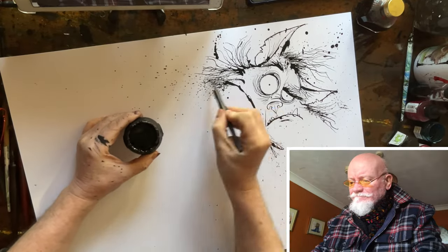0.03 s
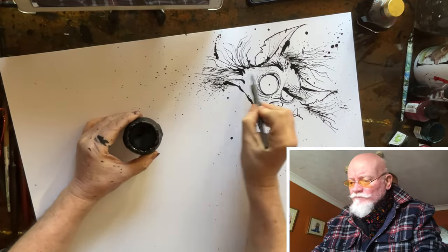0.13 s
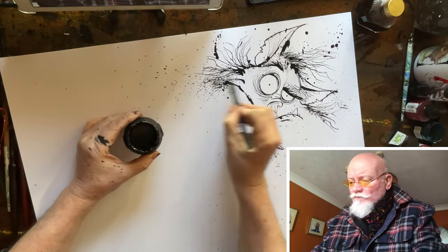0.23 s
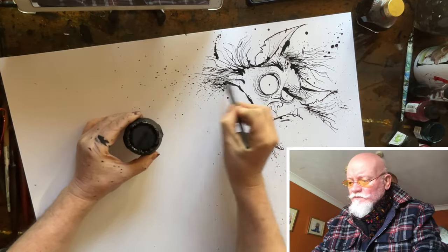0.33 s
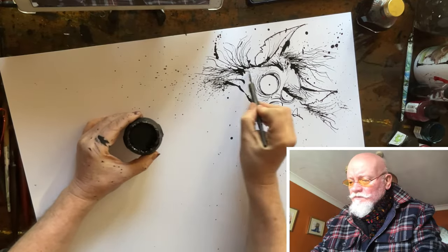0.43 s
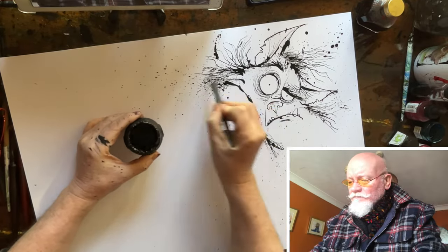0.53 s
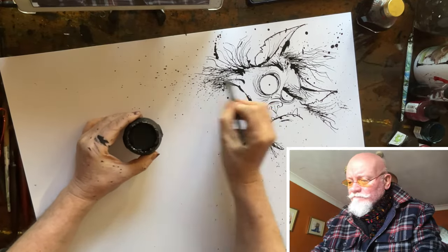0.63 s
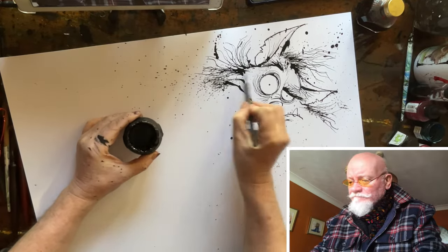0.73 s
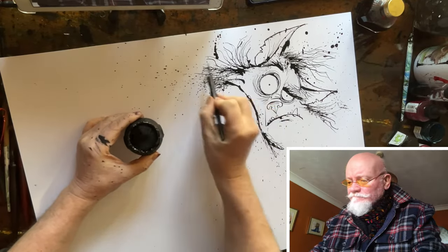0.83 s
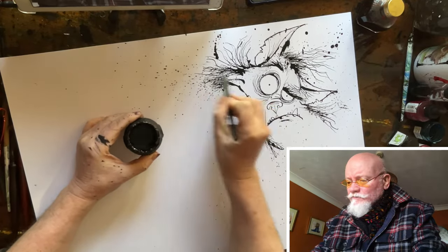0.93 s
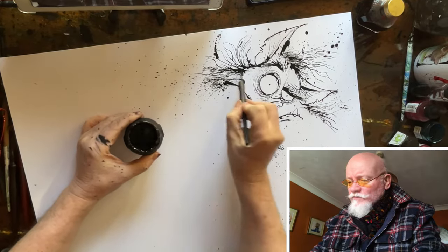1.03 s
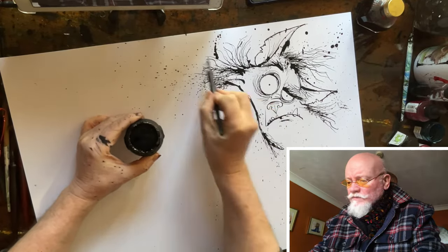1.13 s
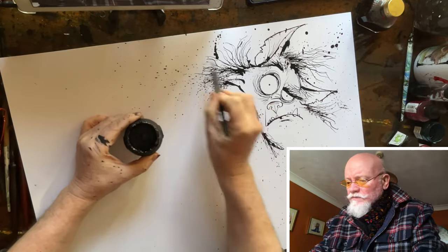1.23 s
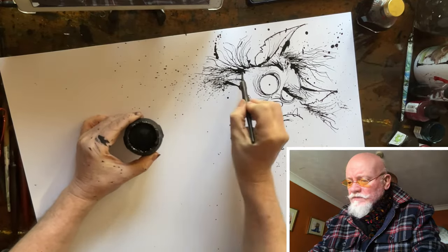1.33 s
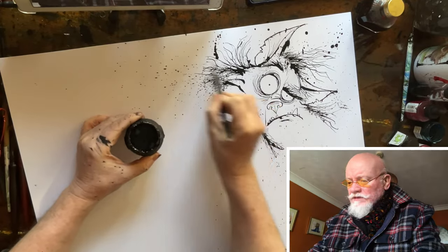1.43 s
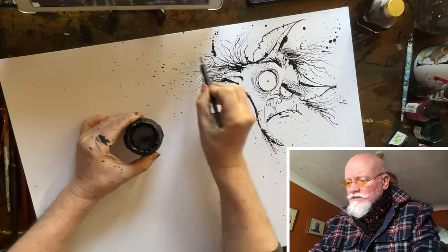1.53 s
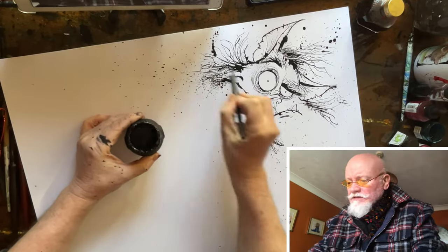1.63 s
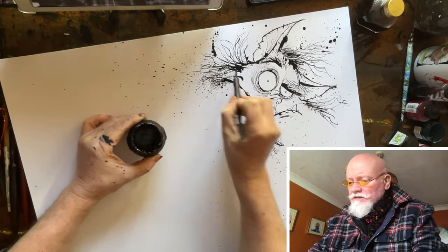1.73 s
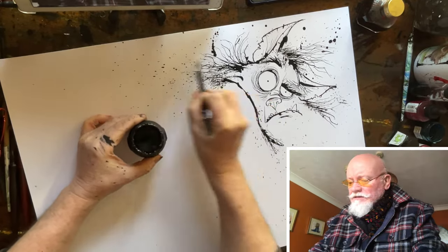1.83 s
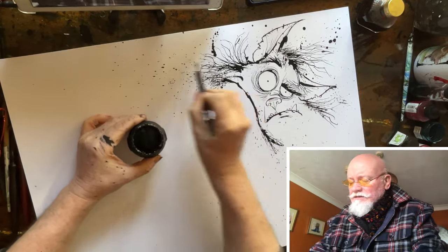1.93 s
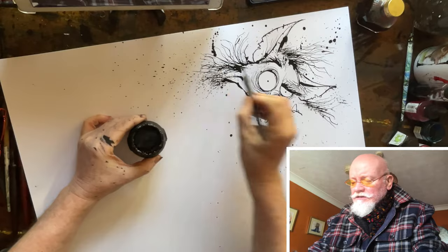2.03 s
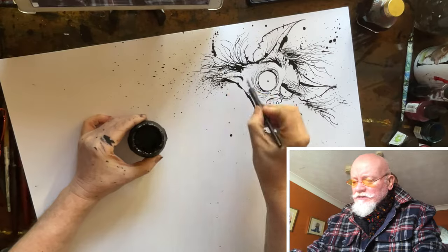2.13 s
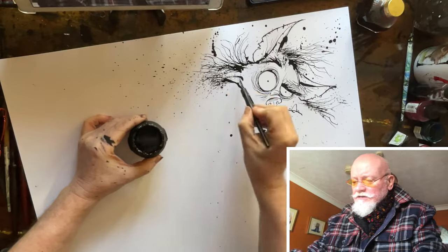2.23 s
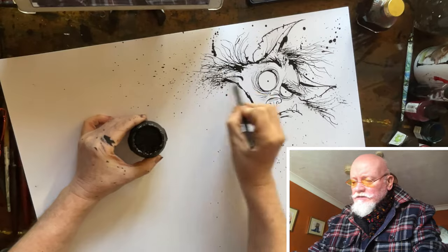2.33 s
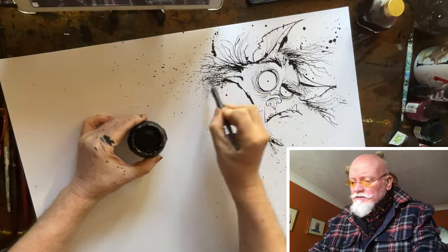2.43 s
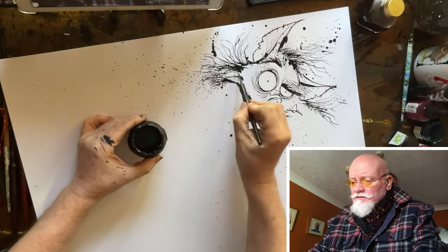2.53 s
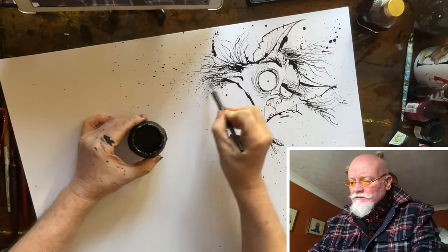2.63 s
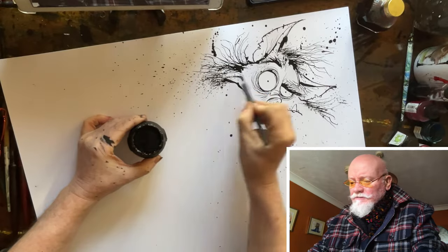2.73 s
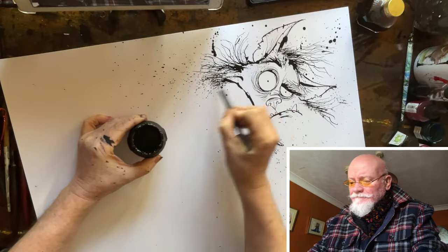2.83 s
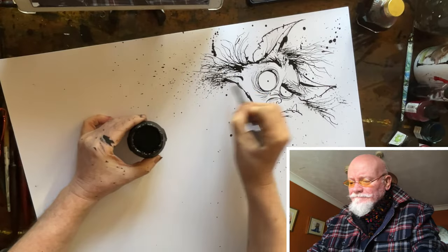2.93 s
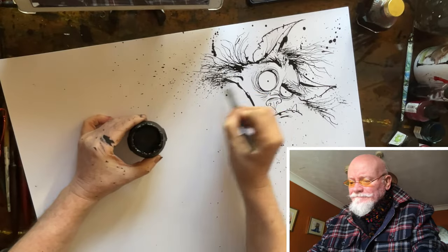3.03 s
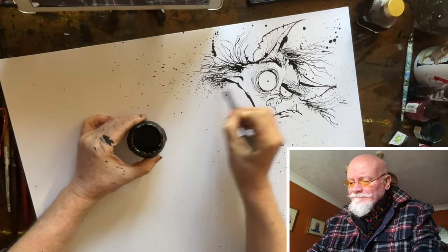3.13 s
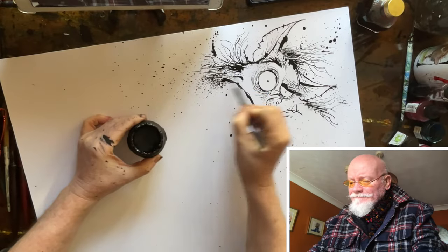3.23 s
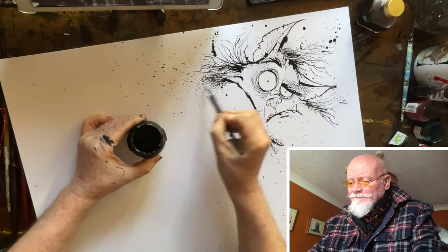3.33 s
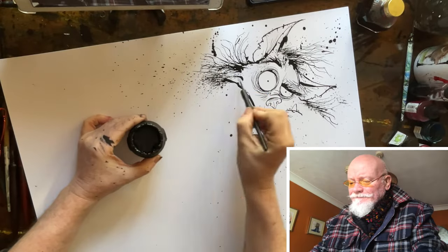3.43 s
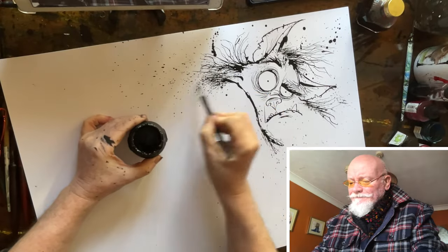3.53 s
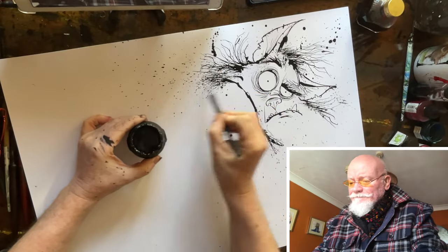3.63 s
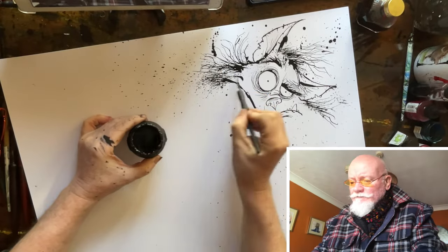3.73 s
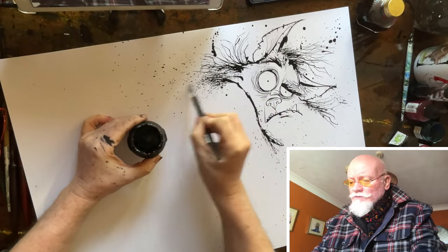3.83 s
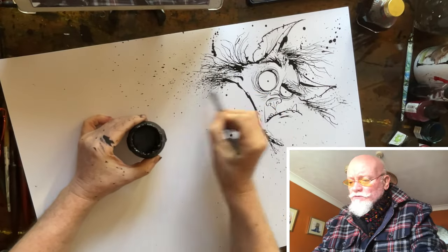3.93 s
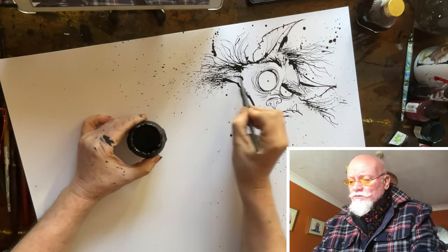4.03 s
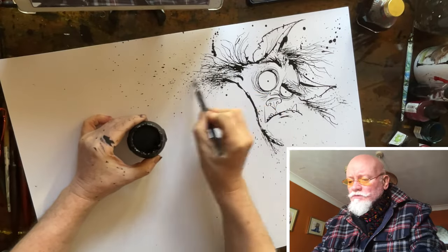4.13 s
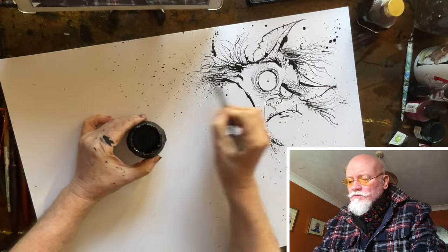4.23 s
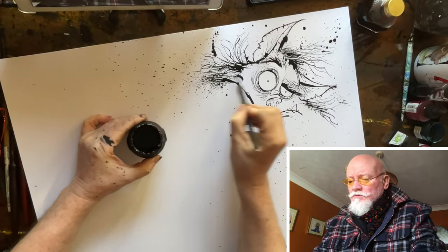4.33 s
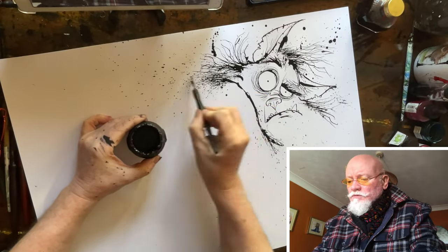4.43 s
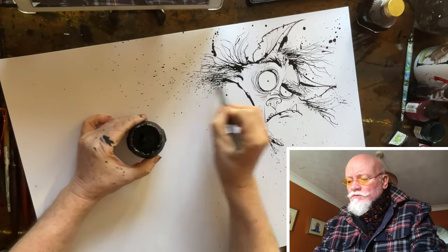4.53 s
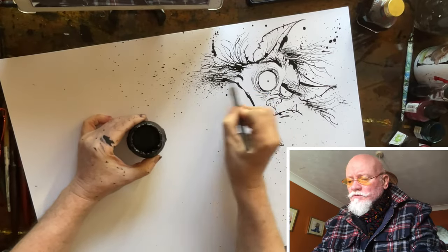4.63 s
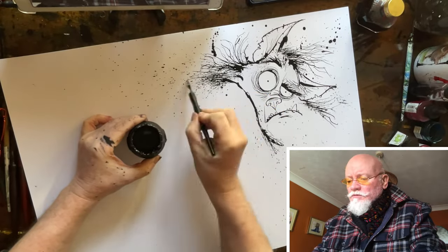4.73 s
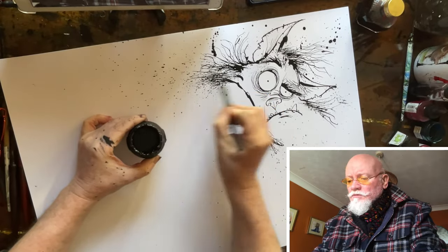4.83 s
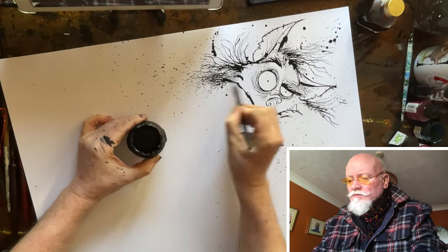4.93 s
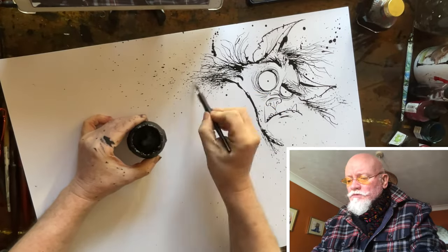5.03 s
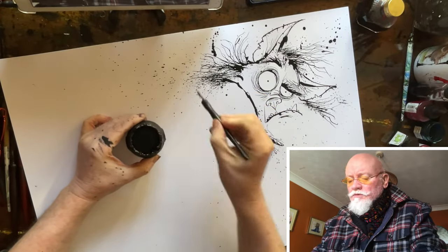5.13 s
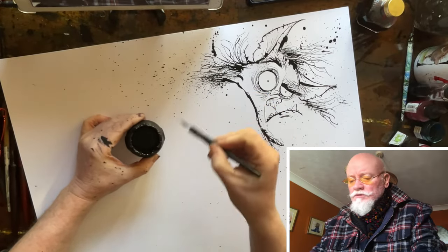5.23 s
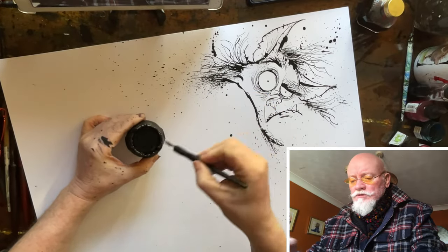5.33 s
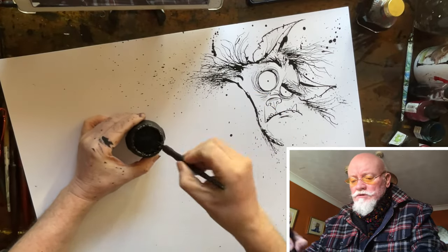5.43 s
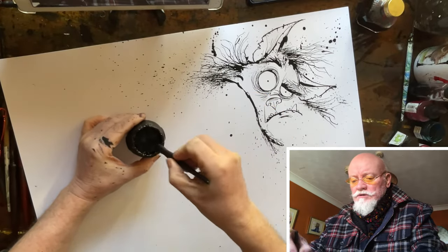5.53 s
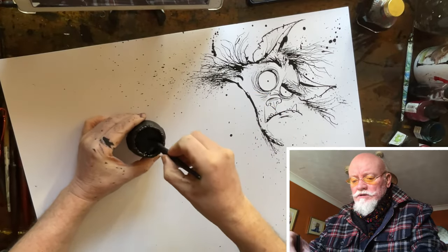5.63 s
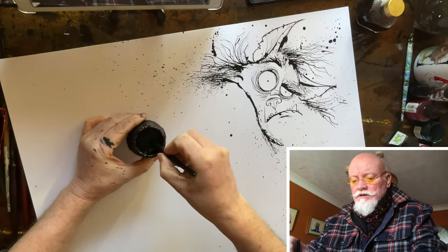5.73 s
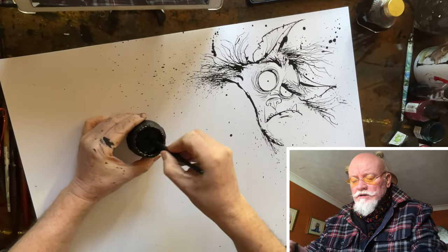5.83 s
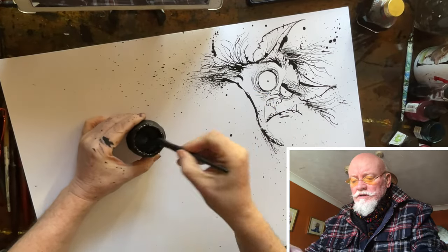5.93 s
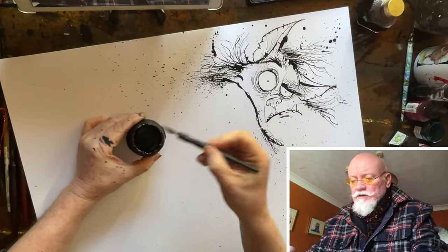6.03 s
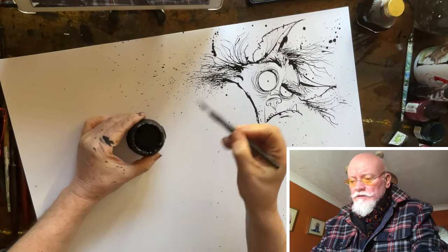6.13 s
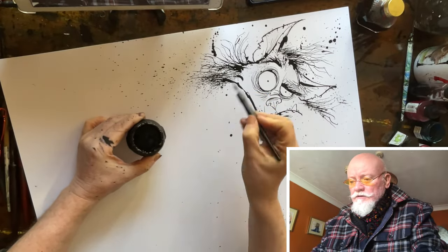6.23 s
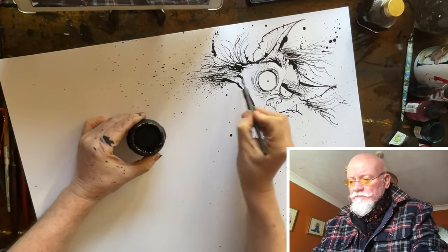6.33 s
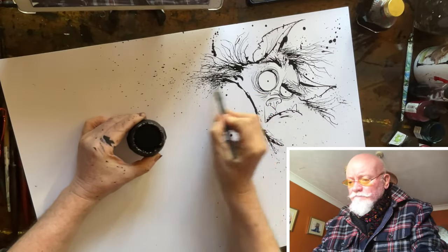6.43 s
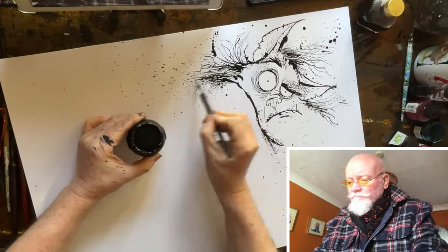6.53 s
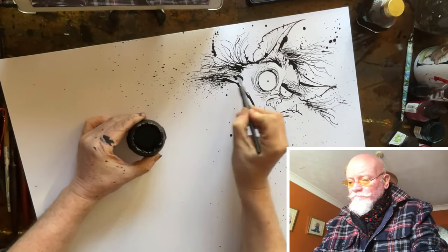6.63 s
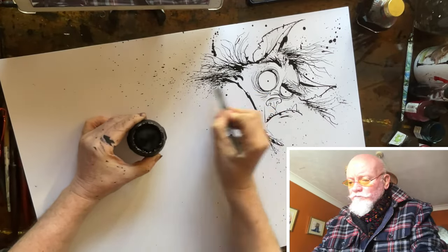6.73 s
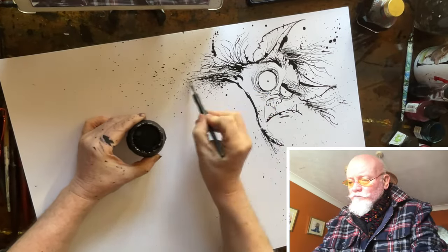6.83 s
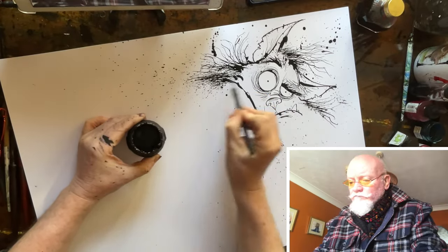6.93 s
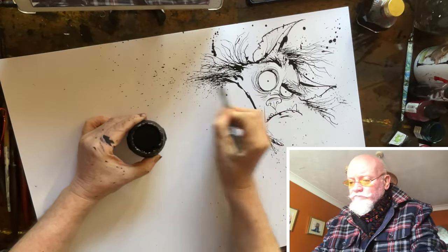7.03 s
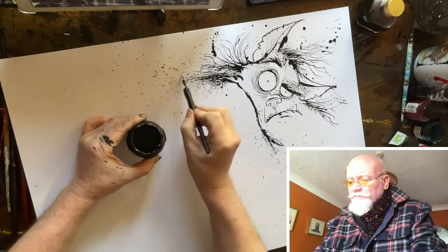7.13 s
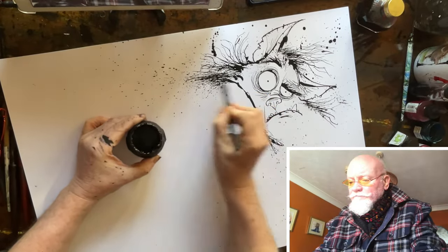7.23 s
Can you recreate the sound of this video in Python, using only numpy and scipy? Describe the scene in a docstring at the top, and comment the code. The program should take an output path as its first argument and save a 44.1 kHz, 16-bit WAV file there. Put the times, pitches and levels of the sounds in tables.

```python
"""A steel dip pen flicks quick hatching strokes over paper on a wooden desk in a small quiet room.
From the start there are still air, faint mains hum and the forearm's rumble. The nib ticks as it lands, then
snaps over the fibres, which sets nib, sheet and desk sounding; between flicks it sometimes drags lightly back.
Then the pen holder knocks, a sleeve rustles, the hand bumps softly on the desk and the nib squeals briefly.
Later, in a pause, the pen goes to the ink pot, with more bumps and rustles; then the last flicks follow."""
import sys
import numpy as np
from scipy import signal
from scipy.fft import rfft, irfft, next_fast_len
from scipy.io import wavfile
from scipy.ndimage import uniform_filter1d

SR = 44100
rng = np.random.default_rng(int(sys.argv[2]) if len(sys.argv) > 2 else 0)


def materialize(psi):
    """Save the field psi as 16-bit PCM at rate SR to the path in sys.argv[1].

    A 1-D psi becomes a single channel; in a 2-D psi each row is a channel.
    """
    bounded = np.clip(np.atleast_2d(psi).T, -1, 1)
    quanta = np.round(bounded * 32767).astype(np.int16)
    wavfile.write(sys.argv[1], SR, quanta)


N = 321048
SIZE = next_fast_len(N + SR // 2)   # samples in a Fourier transform, with space for the room's tail
HZ = np.maximum(np.arange(SIZE // 2 + 1) * SR / SIZE, 1)
TIME = np.arange(N) / SR
APART = np.array([[1], [-1]])   # opposite signs in left and right


def from_db(db):
    """Turn decibels into gain."""
    return 10 ** (np.asarray(db) / 20)


def over_hz(rows, axis=1, hz=HZ):
    """Read one column of a table along a log-frequency axis."""
    rows = np.array(rows)
    return np.interp(np.log(hz), np.log(rows[:, 0]), rows[:, axis])


def in_time(rows):
    """Join (time, value) points into a curve with a value at every sample."""
    return np.interp(TIME, *np.transpose(rows))


def drift(rate):
    """Wander at random around zero, with this many new values a second joined by straight lines."""
    knots = rng.standard_normal(int(N / SR * rate) + 2)
    return np.interp(TIME * rate, np.arange(len(knots)), knots)


def band(low_hz, high_hz, order=8):
    """Gain at each frequency of a band-pass; a higher order is steeper."""
    low_side = 1 + (low_hz / HZ) ** (2 * order)
    high_side = 1 + (HZ / high_hz) ** (2 * order)
    return (low_side * high_side) ** -.5


def colour(x, gain):
    """Filter without pre-echo (minimum phase), keeping the power of white noise."""
    evened = gain / np.sqrt(np.mean(gain ** 2))
    cepstrum = irfft(np.log(evened + 1e-5), SIZE)
    # folding the second half onto the first makes the filter act only after its input
    cepstrum[1:SIZE // 2] *= 2
    cepstrum[SIZE // 2 + 1:] = 0
    return irfft(rfft(x, SIZE) * np.exp(rfft(cepstrum)), SIZE)[..., :N]


def noise(spectrum):
    """Make noise of a given colour, with an rms level of about one."""
    gain = from_db(over_hz(spectrum)) * band(spectrum[0][0], spectrum[-1][0])
    return colour(rng.standard_normal(N), gain)


def bursts(rows, rise_s, decay_s):
    """Loudness curve of blows that rise and die away, cut after half a second."""
    out = np.zeros(N)
    for start, db in rows:
        at = max(int(start * SR), 0)
        t = TIME[:min(N - at, SR // 2)]
        out[at:at + len(t)] += from_db(db) * (1 - np.exp(-t / rise_s)) * np.exp(-t / decay_s)
    return out


# Colour of the room's still air. Each row: frequency in Hz, relative level in dB.
AIR_COLOUR = [(65, -30), (110, -10), (150, -22.5), (193, 0), (210, -26.5), (238, -19), (346, -19.5),
              (444, -23.5), (483, -16.5), (583, -30.5), (1340, -26), (2120, -40), (16000, -62.5)]


def still_air():
    """Steady quiet noise, mostly shared by both sides and partly different left and right."""
    return from_db(-63) * (noise(AIR_COLOUR) + 0.4 * noise(AIR_COLOUR) * APART)


# Faint mains hum. Each row: frequency in Hz, rms level in dB.
MAINS_HUM = [(59.8, -64), (119.6, -70)]


def hum():
    """Mains hum and its octave, as pure tones."""
    return sum(np.sqrt(2) * from_db(db) * np.sin(2 * np.pi * hz * TIME) for hz, db in MAINS_HUM)


# Colour of the desk's rumble under the arm. Each row: frequency in Hz, relative level in dB.
RUMBLE_COLOUR = [(15, -40.5), (25, -27), (40, -9.5), (54, 2), (70, 0.5), (97, -18), (123, -7), (150, -11),
                 (200, -27.5), (330, -120)]
# The forearm shifts its weight. Each row: start in seconds, level in dB before the rise and fade.
WEIGHT_SHIFTS = [(.16, -49), (2.9, -43.5), (3.2, -50.5), (3.96, -39), (5.06, -48), (5.3, -43.5),
                 (5.44, -48), (6.41, -44), (6.95, -51)]


def forearm():
    """The desk rumbles unevenly under the arm all the time, and more when the arm's weight shifts."""
    bed = from_db(-59.5 + 2.5 * drift(8))
    level = bed + bursts(WEIGHT_SHIFTS, rise_s=.04, decay_s=0.052)
    return (noise(RUMBLE_COLOUR) + .08 * noise(RUMBLE_COLOUR) * APART) * level


# Resonances of desk, sheet and nib. Each row: frequency in Hz, width in Hz, relative level in dB.
BODY_RESONANCES = [(182.3, 100, -10), (259.3, 96, -4.5), (384, 310, -10.5), (521, 110, -4.5),
                   (797, 525, -1.5), (1190, 920, -27), (1680, 290, -7), (2238, 786, -2), (2540, 490, -6.5),
                   (3660, 760, -14), (4580, 860, -8), (5910, 870, -9.5), (7590, 940, -2.5),
                   (7940, 100, -14), (8580, 2800, -4.5), (9610, 890, -4), (11420, 1500, -6.5),
                   (12850, 1800, -7.5), (14240, 960, -3.5), (15300, 1100, -7)]


def pen_response():
    """Add the power of all resonances of desk, sheet and nib: gain at each frequency."""
    power = 0
    for hz, width, db in BODY_RESONANCES:
        detune = (HZ ** 2 - hz ** 2) / (HZ * width)
        power = power + from_db(2 * db) / (1 + detune ** 2) ** 2
    return np.sqrt(power)


def fibres(per_s, spread_db, smooth_share, slip_db):
    """Friction force: fibres snap at random over a smooth rub, in clumps as the nib sticks and slips."""
    strength = from_db(spread_db * np.minimum(rng.exponential(1, N), 4))
    snaps = (rng.random(N) < per_s / SR) * rng.choice([-1, 1], N) * strength
    rub = smooth_share * rng.standard_normal(N)
    force = (snaps / snaps.std() + rub) * from_db(slip_db * drift(420))
    return force / force.std()


# Firm outward flicks. Each row: start in seconds, end in seconds, base level in dB, swell (rise along the
# stroke) in dB, weight (how hard the nib leans into the desk) in dB, landing tick in dB.
# Each part of the sound takes its own share of swell and weight.
OUTWARD_FLICKS = [(0, 0.038, -27, -17, 2, -34), (0.1999, 0.297, -29, 2, -1, -15.5),
                  (0.4658, 0.572, -26.5, 0.5, 1, -16.5), (.751, 0.863, -28, 7.5, 3, -16),
                  (1.056, 1.176, -31, 5, 0, -40.5), (1.396, 1.49, -27, 2.5, 4.5, -15),
                  (1.7666, 1.883, -28.5, -2, -4, -24), (2.34, 2.431, -29.5, 0.5, -4, -52),
                  (2.589, 2.658, -27.5, 5, -3.5, -19), (2.802, 2.885, -27.5, 0, -0.5, -12),
                  (3.02, 3.095, -28, 0.5, -3, -26), (3.242, 3.321, -24, 0, -1, -17),
                  (3.474, 3.581, -25.5, -1, 3.5, -18.5), (3.7653, 3.873, -24.5, 3, 2, -15),
                  (4.0625, 4.178, -26.5, -1, -0.5, -17.5), (4.352, 4.46, -23.5, 2, 1, -18),
                  (4.649, 4.754, -26.5, 1.5, -4.5, -20.5), (4.943, 5.043, -26.5, 2, -2, -20),
                  (6.41, 6.519, -31.5, -2.5, -5, -38), (6.704, 6.819, -27, 2.5, 1, -29),
                  (7.018, 7.132, -24, 4, 2, -20)]
# Light drags back. Each row: start in seconds, end in seconds, base level in dB, swell in dB.
BACK_DRAGS = [(.328, 0.429, -42, 9.5), (0.619, 0.627, -42, -3.5), (0.695, 0.713, -41, 0),
              (0.914, 1.028, -44, -5.5), (3.2, 3.21, -34, -3), (3.905, 3.942, -43.5, -1.5),
              (4.206, 4.233, -45, -2), (4.26, 4.339, -46, -8), (4.505, 4.519, -44, 4),
              (4.59, 4.617, -43, 1.5), (6.383, 6.41, -46.5, 0)]


def strokes():
    """List every pass of the nib: start, end, level, swell, weight, and whether it is drawn backwards."""
    outward = [(*row[:5], False) for row in OUTWARD_FLICKS]
    return outward + [(*row, 0, True) for row in BACK_DRAGS]


GRAZE_S = .022   # seconds of light grazing before each stroke


def flicks(gain_db, weight_share, swell_share, rise_db, arch_db, land_s, lift_s, graze_db, drag_db):
    """Loudness curve of the strokes: the nib grazes, bites, speeds up towards mid-stroke, then lifts off."""
    out = np.zeros(N)
    for start, end, level_db, swell_db, weight_db, backwards in strokes():
        near = slice(max(int((start - GRAZE_S) * SR), 0), int(start * SR) + SR // 4)
        t, length = TIME[near] - start, max(end - start, .005)
        along = np.clip(t / length, 0, 1) - .5   # -0.5 at the start, 0.5 at the end
        graze = from_db(graze_db) * np.clip(1 + t / GRAZE_S, 0, 1)
        bite = 1 - np.exp(-np.maximum(t, 0) / land_s)
        lift = np.exp(-np.maximum(t - length, 0) / lift_s)
        shape_db = (rise_db + swell_share * swell_db) * along - arch_db * (2 * along) ** 2
        stroke_db = gain_db + level_db + weight_share * weight_db + backwards * drag_db
        out[near] += (graze + bite) * lift * from_db(stroke_db + shape_db)
    return out


def sinking_note(first_hz, last_hz, width_hz):
    """A hollow resonance, made of narrow noise, that falls in pitch along each stroke."""
    points = []
    for start, end, *_ in sorted(strokes()):
        points += [(start, first_hz), (end, last_hz)]
    hz = in_time(points)
    wobble = colour(rng.standard_normal(N), band(1, width_hz / 2, order=2))
    return np.sqrt(2) * wobble * np.cos(2 * np.pi * np.cumsum(hz) / SR)


def scratching():
    """One friction force drives nib, sheet and desk; the lower tones depend more on the nib's weight."""
    hiss = flicks(-0.24, weight_share=-.05, swell_share=1.3, rise_db=.2, arch_db=5.5,
                  land_s=0.0024, lift_s=0.0078, graze_db=-26, drag_db=-1.5)
    edge = flicks(-0.48, weight_share=0, swell_share=1.1, rise_db=0.5, arch_db=5.0,
                  land_s=0.0037, lift_s=0.014, graze_db=-25, drag_db=3.5)
    rasp = flicks(-13.0, weight_share=0.25, swell_share=1.0, rise_db=3.0, arch_db=5.5,
                  land_s=0.002, lift_s=0.018, graze_db=-10.5, drag_db=-2)
    drone = flicks(-11.5, weight_share=.7, swell_share=.6, rise_db=3.0, arch_db=5,
                   land_s=.0038, lift_s=.014, graze_db=-14, drag_db=-6.5)
    deep = flicks(-16.0, weight_share=1.26, swell_share=0.75, rise_db=1.5, arch_db=2,
                  land_s=.0035, lift_s=.016, graze_db=-12, drag_db=-1.5)
    # each zone: loudness curve, low edge in Hz, high edge in Hz, gain in dB
    zones = [(hiss, 10500, 17000, -3.0), (hiss, 6600, 10500, -3.2), (edge, 3300, 6600, -8.5),
             (rasp, 1300, 3300, -1.0), (drone, 620, 1300, -1.0), (deep, 150, 620, 0.0)]
    force = fibres(per_s=3200, spread_db=3.0, smooth_share=0.51, slip_db=2.0) * from_db(1.35 * drift(110))
    body = pen_response()
    rub = 0
    for level, low, high, db in zones:
        # the colour wanders as the nib flexes and turns
        wander = from_db(db + 1.42 * drift(45) + .8 * drift(6))
        rub = rub + colour(force * level * wander, body * band(low, high))
    note = from_db(-1.0) * drone * sinking_note(first_hz=932.4, last_hz=653, width_hz=99)
    # now and then a tine hooks a coarse fibre and pings free; light drags do it too
    hooks = fibres(per_s=130, spread_db=2.5, smooth_share=0, slip_db=1.0) * hiss ** .7
    pings = from_db(-14.0) * colour(hooks, body * band(11000, 19000, order=3))
    return rub + note + pings


def hand_bounce(x, delay_s, swing_s, gain_db):
    """The moving hand throws sound back from close by, so hollow notches wander through the scratch."""
    back = from_db(gain_db) * np.interp(TIME - delay_s - swing_s * drift(7), TIME, x)
    return (x + back) / np.sqrt(1 + from_db(2 * gain_db))


# The nib catches on a coarse fibre or taps the sheet; the rows at 1.5273 s and 6.286 s give the bright crack of
# the holder's knocks. Each row: start in seconds, strike level in dB.
FIBRE_SNAGS = [(.0149, -20), (.1775, -40), (0.394, -17.5), (.427, -21.5), (1.3525, -28), (1.379, -32),
               (1.4599, -4), (1.5273, -5.5), (2.3, -48), (3.25, -10.5), (3.4853, -6.5), (3.855, -9),
               (4.0263, -25.5), (4.322, -29), (4.4194, -4.5), (6.286, -56), (6.383, -35), (6.7328, -6.5)]


def ticks():
    """Steel meets paper: a very short hard crack, then a brief rattle of the tines; light touches are duller."""
    landings = [(start, tick_db) for start, *_, tick_db in OUTWARD_FLICKS]
    # the nib touches lightly just before a flick
    touches = [(start - GRAZE_S, -50) for start, _ in landings if start > GRAZE_S]
    hits = landings + FIBRE_SNAGS
    rattle = from_db(-17.0) * bursts(hits, rise_s=0.00026, decay_s=0.0024)
    crack = bursts(hits, rise_s=.00005, decay_s=0.00025) + rattle
    grit = rng.choice([-1., 1.], N)
    hard = colour(grit * crack, pen_response() ** .5 * band(10000, 18000, order=1))
    landing_blows = bursts(landings, rise_s=.0003, decay_s=.003)
    thud = colour(grit * landing_blows, pen_response() * band(300, 3000, order=2))
    light_blows = bursts(touches, rise_s=.0001, decay_s=0.0016)
    soft = colour(grit * light_blows, band(2500, 9000, order=1))
    return from_db(-.5) * hard + from_db(-22) * thud + soft


# The pen holder knocks lightly. Each row: start in seconds, strike level in dB.
HOLDER_KNOCKS = [(1.5269, -30.5), (6.286, -56.5)]


def knocks():
    """A short dry note of the wooden holder, made from a quick burst of noise."""
    blows = bursts(HOLDER_KNOCKS, rise_s=0.00024, decay_s=0.0028)
    return colour(rng.choice([-1., 1.], N) * blows, band(1200, 3400, order=4))


# Colour of the sleeve's rustle. Each row: frequency in Hz, relative level in dB.
RUSTLE_COLOUR = [(530, -25), (900, -2.5), (2000, -7), (2630, -2.5), (3870, -8.5), (8940, -11), (15000, -28)]
# The sleeve brushes the paper. Each row: start in seconds, base level in dB, fade time in seconds.
SLEEVE_BRUSHES = [(1.62, -64, 0.22), (5.223, -56, .1), (5.42, -68.5, 0.13), (5.96, -62, 0.03),
                  (6.09, -64.5, 0.042), (6.18, -58, 0.042)]


def sleeve():
    """Cloth brushes unevenly over the paper, as noise with a flickering level."""
    brushing = sum(bursts([(start, db)], 0.013, fade_s) for start, db, fade_s in SLEEVE_BRUSHES)
    return noise(RUSTLE_COLOUR) * brushing * from_db(2.7 * drift(60))


# Soft bumps of the hand on the desk. Each row: start in seconds, level in dB before rise, fade and gain.
HAND_BUMPS = [(3.674, -40), (3.947, -33), (3.975, -33), (4.039, -38.5), (4.79, -36.5), (5.222, -41),
              (5.265, -37.5), (5.419, -36), (5.921, -44.5), (6.122, -41), (6.154, -40), (6.385, -37.5)]
# Colour of those bumps. Each row: frequency in Hz, relative level in dB.
THUMP_COLOUR = [(71, -21), (120, -13.5), (372, -3), (609, -14.5), (964, -22), (1100, -35), (1230, -27),
                (2000, -38), (2600, -70), (4400, -120)]


def hand():
    """Dull bumps on the desk, as short bursts of low noise."""
    return from_db(-5.0) * noise(THUMP_COLOUR) * bursts(HAND_BUMPS, rise_s=0.0027, decay_s=0.025)


# The nib squeals on a return drag. The one row: start in seconds, end in seconds.
SQUEAL_SPAN = (4.26, 4.296)


def squeal():
    """The tines chatter for a moment in one broad resonance."""
    along = np.interp(TIME, SQUEAL_SPAN, (0, 1))
    swell = np.sqrt(np.abs(np.sin(np.pi * along ** .7)))
    return from_db(-34.5) * swell * colour(rng.standard_normal(N), band(3800, 4900, order=6))


def near_echoes(x, first_s, last_s, swing_s, spread_s, count):
    """Desk, hand and pot reflect the sound; paths change as the pen moves, each reaching one port first."""
    out = np.zeros((2, N))
    for k in range(count):
        delay = rng.uniform(first_s, last_s) + swing_s * drift(4)
        lead = spread_s * rng.uniform(-0.967, 1)
        out += [(-1) ** k * np.interp(TIME - delay + side, TIME, x) for side in (lead, -lead)]
    return out / np.sqrt(count)


def all_round(evenness):
    """Each treble resonance leaves the pen its own way, so the room's tail gets a smoother spectrum."""
    grid = np.geomspace(100, 20000, 230)
    level = np.interp(grid, HZ, np.log(pen_response()))
    ripple = (level - uniform_filter1d(level, size=30)) * (grid > 1300)
    return np.exp(-evenness * np.interp(HZ, grid, ripple))


def afterring(low_hz, high_hz, t60, gain_db):
    """Something near the desk rings on faintly in one narrow band, up to half a second: its response."""
    t = TIME[:SR // 2]
    tail = rng.standard_normal((2, len(t))) * from_db(-60 * t / t60)
    return from_db(gain_db) * band(low_hz, high_hz) * rfft(tail / np.linalg.norm(tail[0]), SIZE)


# The pen as the two microphone ports hear it. Each row: frequency in Hz, phase lead of the left in radians,
# left-right level difference in dB.
EAR_PORTS = [(150, 0.2, -0.5), (950, 0.9, -0.3), (1450, -0.1, -1.2), (1900, -1.7, -3.2), (2900, -3.9, -2.4),
             (4500, -7.5, -2.0), (6000, -6.6, -2.8), (7500, -8.4, -4.3), (8600, -9.9, -5.3),
             (9800, -10.7, -4.1), (10600, -11.0, 0.2), (12500, -12.5, -0.1), (13700, -13.1, 0.0),
             (15600, -15.2, -0.1)]
# The room's answer. Each row: frequency in Hz, time to fall by 60 dB in seconds, tail level in dB
# (before the tail is evened out), near reflections in dB.
ROOM_BANDS = [(200, 0.93, -11, -11), (770, 0.25, -7.5, -5.5), (2500, 0.29, -8.5, 3), (4830, 0.27, -6, -2.5),
              (9390, 0.23, -11.5, -1.5), (10950, 0.18, -13.5, -16.5), (15100, 0.23, -18.5, 5.5)]


def room(x):
    """Direct sound at two ports, near reflections, and a tail of half a second at most that dies by band."""
    t = TIME[:SR // 2]
    # half of the left-right difference goes to each side
    half = 1j * over_hz(EAR_PORTS) / 2 + np.log(from_db(over_hz(EAR_PORTS, axis=2))) / 2
    answer = np.exp([half, -half]) + afterring(low_hz=2500, high_hz=2780, t60=1.5, gain_db=-20)
    mid, side = rng.standard_normal((2, len(t))) * (t > .005)
    evened = all_round(evenness=.8)
    for k, (hz, t60, tail_db, _) in enumerate(ROOM_BANDS):
        share = over_hz([(row[0], j == k) for j, row in enumerate(ROOM_BANDS)])
        width = min(hz / 800, 1)   # long waves reach both ports alike
        tail = (mid + width * side * APART) * from_db(-60 * t / t60)
        answer = answer + share * evened * rfft(from_db(tail_db) * tail / np.linalg.norm(tail[0]), SIZE)
    near = near_echoes(x, first_s=0.001184, last_s=.009, swing_s=.0002, spread_s=0.000255, count=12)
    near_spectrum = rfft(near, SIZE) * from_db(over_hz(ROOM_BANDS, axis=3))
    return irfft(rfft(x, SIZE) * answer + near_spectrum, SIZE)[:, :N]


def scene():
    """Pen, sleeve and hand in the room, over desk rumble, hum and still air."""
    nib = hand_bounce(from_db(-1.72) * scratching(), delay_s=0.0006986, swing_s=.00015, gain_db=-10.5)
    in_room = room(nib + ticks() + knocks() + sleeve() + hand() + squeal())
    return in_room + forearm() + still_air() + hum()


def record(dry):
    """Cut the top steeply above 15900 Hz."""
    return signal.sosfilt(signal.ellip(12, .1, 80, 15900, fs=SR, output="sos"), dry)


dry = scene()
out = record(dry)
materialize(out)
```